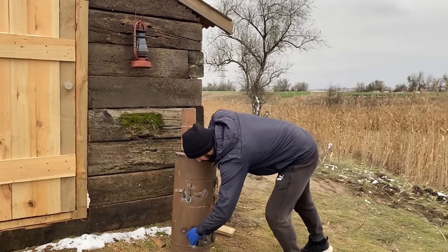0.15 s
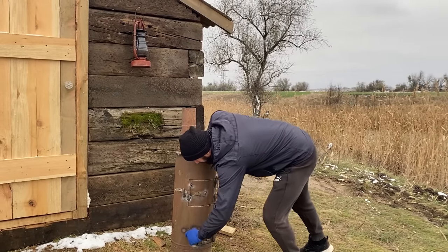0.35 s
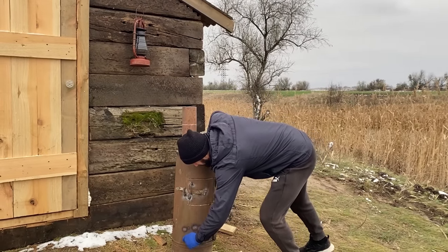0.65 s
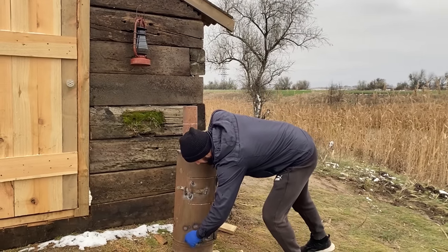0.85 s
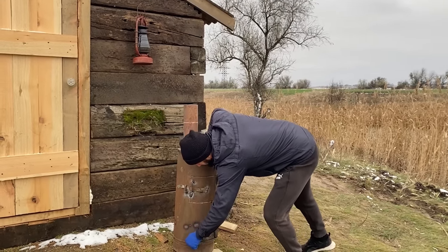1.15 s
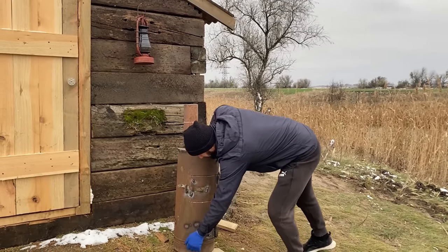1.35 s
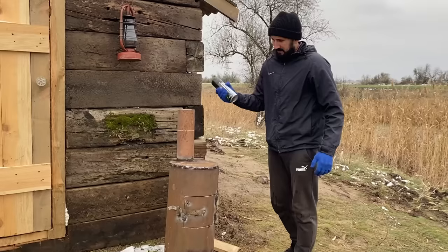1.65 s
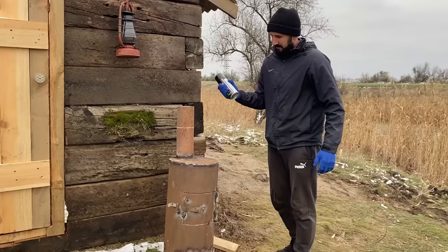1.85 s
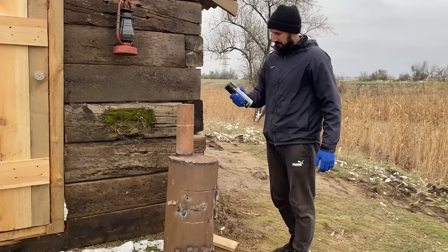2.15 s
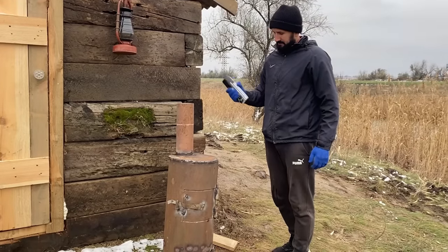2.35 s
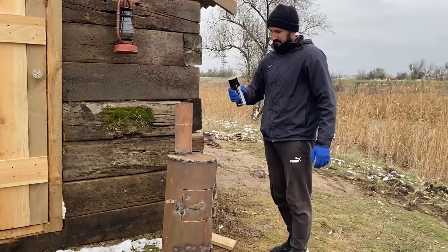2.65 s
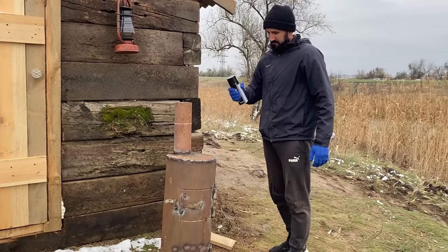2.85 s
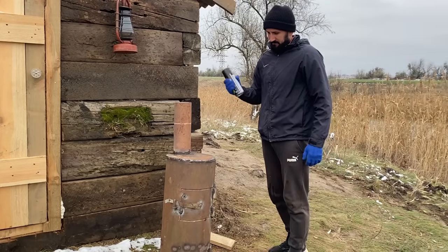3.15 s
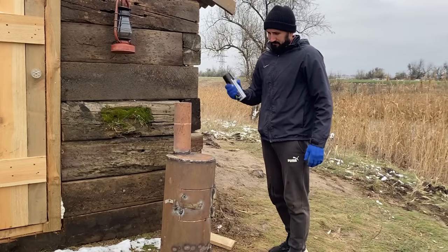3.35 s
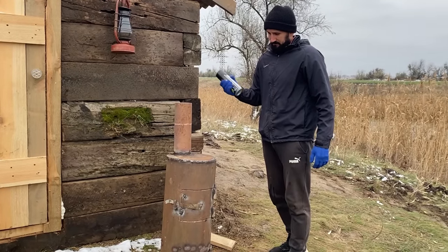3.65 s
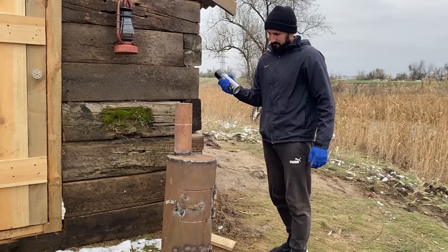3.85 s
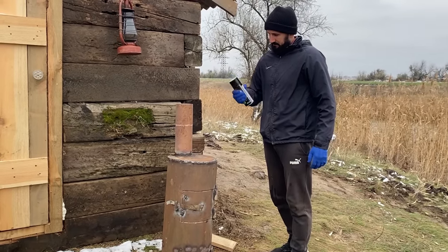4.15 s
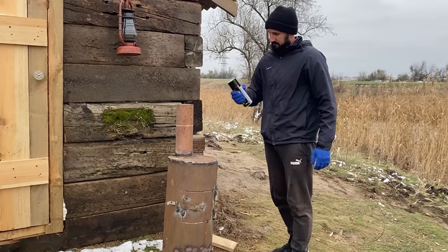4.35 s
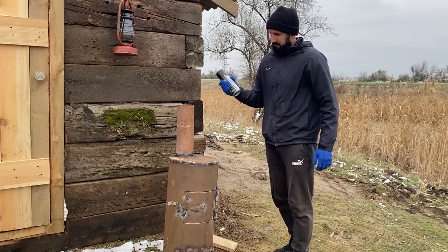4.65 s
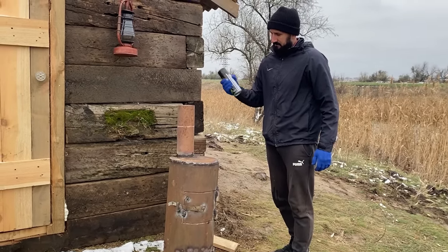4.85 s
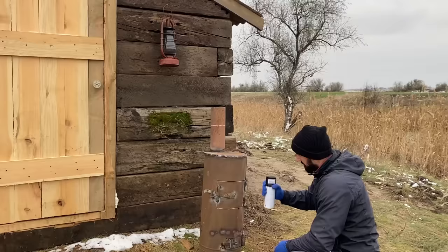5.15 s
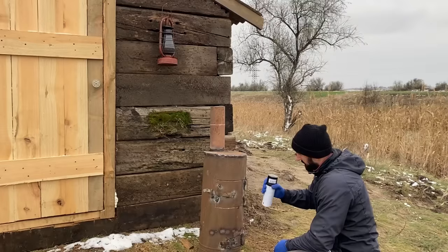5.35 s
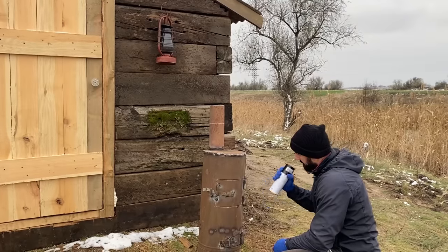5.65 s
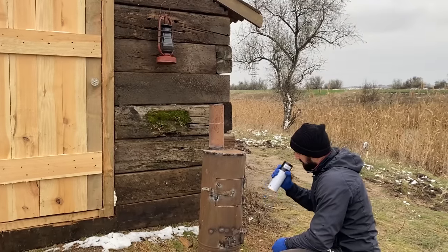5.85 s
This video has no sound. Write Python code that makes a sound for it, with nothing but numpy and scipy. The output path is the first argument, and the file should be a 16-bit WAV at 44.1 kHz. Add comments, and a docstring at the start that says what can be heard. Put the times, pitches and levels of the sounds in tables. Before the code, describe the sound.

A steel drum near the centre gives a bright crashing clang and, half a second later, a second ringing knock, with soft bumps underneath. Then an aerosol can rattles, about four or five strokes a second, hard double clacks alternating with hollower knocks over wet swishing. Breeze buffets the microphones in uneven gusts, swelling mid-way. The space is open and nearly dry, with only slight reflections from ground and shed.

```python
"""Outdoors by a wooden shed, heard on a close pair of microphone ports: a breeze rumbles over the hush of a field.
A steel stove drum just left of centre takes two main knocks and lighter touches: decaying noise plus ringing modes.
Dull bumps of sinking pitch and swells of low rumble lie under them. Then a spray-paint can is shaken: paint swishes
as surging noise, and the mixing ball clacks on the domed base, knocks in the top and ticks along the wall.
Near the end the can moves a little to the right."""
import sys
import numpy as np
from scipy import signal
from scipy.fft import rfft, irfft, next_fast_len
from scipy.io import wavfile

SR = 44100
rng = np.random.default_rng(int(sys.argv[2]) if len(sys.argv) > 2 else 0)


def master_out(mix):
    """Clip the mix to full scale and print it as 16-bit PCM to the path in sys.argv[1]."""
    frames = np.transpose(np.atleast_2d(mix))
    ceiling = np.clip(frames, -1, 1)
    pcm = np.round(ceiling * 32767).astype(np.int16)
    wavfile.write(sys.argv[1], SR, pcm)


N = 264159


def amp(db):
    """Decibels to gain."""
    return 10 ** (np.asarray(db) / 20)


def unit(x):
    """Scales to rms 1."""
    return x / np.sqrt(np.mean(x ** 2) + 1e-20)


def read(points, hz):
    """Reads a table on a log-frequency axis."""
    f, value = np.transpose(points)
    return np.interp(np.log(hz + 1), np.log(f + 1), value)


def follow(points):
    """Reads a time curve at every sample."""
    return np.interp(np.arange(N) / SR, *np.transpose(points))


def add(mix, s, sound):
    """Adds a sound into the mix at time s, cut off at the end of the mix."""
    part = mix[..., max(round(s * SR), 0):][..., :sound.shape[-1]]
    part += sound[..., :part.shape[-1]]


def fade(t, t60):
    """Exponential decay that falls 60 dB in t60 seconds."""
    return np.exp(-np.log(1000) * t / t60)


def colour(x, spectrum, bright_db=0):
    """Minimum-phase filter with the given spectrum; brightness lifts the treble against the middle."""
    size = next_fast_len(2 * len(x))
    hz = abs(np.fft.fftfreq(size, 1 / SR))
    treble = 1 / (1 + (3000 / (hz + 1)) ** 6)
    log_gain = np.log(amp(read(spectrum, hz) + bright_db * treble))
    response = np.exp(np.conj(signal.hilbert(log_gain)))  # the phase that keeps the filter causal
    return np.fft.ifft(np.fft.fft(x, size) * response).real[:len(x)]


def noise(spectrum):
    """Steady noise of rms 1 with the given spectrum."""
    hz = np.fft.rfftfreq(N, 1 / SR)
    white = rng.standard_normal(N)
    return unit(irfft(rfft(white) * amp(read(spectrum, hz)), N))


def wander(per_s):
    """A slow random curve of rms 1, with per_s new targets a second."""
    knots = np.arange(N) / SR * per_s
    return unit(np.interp(knots, np.arange(N), rng.standard_normal(N)))


def at_level(x, db, seconds):
    """Scales a hit so that its energy, spread over the given time, has this level."""
    return amp(db) * x * np.sqrt(seconds * SR / np.sum(x ** 2))


def yard(x):
    """Dull early reflections from ground and shed, then a thin scatter; drawn afresh per sound and per port."""
    t = np.arange(6000) / SR
    early, late = rng.standard_normal((2, 2, len(t)))
    band = signal.butter(2, [1500, 6000], "band", fs=SR)
    early = signal.lfilter(*band, early * fade(t, 0.026))
    late = late * fade(t, 0.22) * np.minimum(t / 0.013, 1)
    echo = amp(-14) * early / np.linalg.norm(early[0]) + amp(-32.5) * late / np.linalg.norm(late[0])
    return x + signal.fftconvolve(x[None], echo, axes=1)[:, :len(x)]


def aside(x, lag_s):
    """Moves a sound sideways: a positive lag delays the left port against the right."""
    half = np.exp(-1j * np.pi * np.fft.rfftfreq(N, 1 / SR) * lag_s)
    return irfft(rfft(x) * np.array([half, 1 / half]), N)


# strength of the breeze at the ports, before trim and gusting: t/s, level/dB
WIND = [(0, -52), (.25, -55.5), (1.1, -52.5), (1.4, -48.5), (2.4, -44), (3.8, -56), (4.7, -50.5),
        (5.12, -51.5), (5.24, -67), (5.99, -67.5)]
# low rumble of wind on the ports: f/Hz, level/dB
WIND_COLOUR = [(20, -31), (48, 1), (95, 1), (150, -9.5), (250, -19), (1500, -62)]
# hush of the open field: f/Hz, level/dB
AIR = [(40, -23), (350, -7), (700, 3), (1000, -18.5), (4000, -15.5), (12000, -17), (15000, -48)]


def wind():
    """Lumpy low noise, mostly shared by the two ports, over the steady hush of the field."""
    shared = noise(WIND_COLOUR)
    own = np.array([noise(WIND_COLOUR), noise(WIND_COLOUR)])
    gust_db = follow(WIND) + 4.4 * wander(per_s=29) - 2.5
    return (shared + amp(-6) * own) * amp(gust_db) + amp(-60.5) * noise(AIR)


# blows on the drum: t/s, level/dB (before a 0.5 dB trim), brightness/dB, rise/s, place (0 side to 1 rim)
DRUM_BLOWS = [(0.031, -34.5, -20.5, 0.02, 0), (0.381, -21, -4, 0.011, 0), (.412, -12, 7, 0.0022, 0.24),
              (.553, -40.5, -6.5, 0.015, 0.19), (0.649, -38.5, -11.5, 0.025, 0.79),
              (.686, -37, -10, 0.018, 0.54), (1.053, -14, 1, 0.015, 0.86),
              (1.403, -35.5, -19.5, 0.02, 0.56)]
# separate modes of the drum: f/Hz, level struck on the side/dB, level struck on the rim/dB, t60/s
DRUM_MODES = [(269, -20, -13.5, 0.53), (438, -20, -1.5, 0.39), (588, -23, -22, 1), (627, -21.5, -22.5, 2),
              (647, -16, -17, 1), (699.7, 1.5, -11, 0.43), (815, -13.5, -10, 0.26), (946, -17.5, -28, 2),
              (1008, -9.5, -9, 0.28), (1190, 2.5, 4, 0.19), (1219, 2.5, -15, 0.25), (1240, 10, 10, 0.14),
              (1540, -28, -6.5, 0.6), (1604, -35, 6, .33), (1810, -12.5, 6, 0.24), (1916, -12.5, -11, 0.64),
              (2090, -13, -0.5, 0.15), (2570, -8.5, -21.5, 0.14), (2940, 6.5, -20, 0.04),
              (3880, -24.5, -9.5, 0.32), (4310, -4.5, -22.5, 0.1)]
# dense upper modes of the sheet steel: f/Hz, level/dB
CLASH = [(100, -13.5), (500, -5.5), (1200, -3), (2200, 1.5), (4300, -1), (6800, -11), (8000, -10.5),
         (12400, -19.5), (14500, -49.5)]
# how long the wash of crowded modes lasts: f/Hz, t60/s
CLASH_T60 = [(600, 0.6), (2000, 0.42), (4000, 0.25), (10000, 0.18)]


def drum():
    """Each blow is a clash of sheet steel: a short crash, a wash of crowded modes and a few that ring on alone."""
    out, t = np.zeros((2, N)), np.arange(3 * SR // 2) / SR
    hz, side_db, rim_db, t60 = np.transpose(DRUM_MODES)[:, :, None]
    modes = fade(t, t60) * np.sin(2 * np.pi * (hz * t + rng.random(hz.shape)))
    for s, db, bright_db, rise, place in DRUM_BLOWS:
        mode_db = side_db + (rim_db - side_db) * np.clip(place, 0, 1)
        ring = amp(mode_db)[:, 0] @ modes
        f, when, z = signal.stft(rng.standard_normal(len(t)), SR, nperseg=256)
        decay = fade(when, read(CLASH_T60, f)[:, None])
        wash = signal.istft(z * decay, SR, nperseg=256)[1][:len(t)]
        crash = rng.standard_normal(len(t)) * fade(t, 0.11)
        clash = colour(crash + amp(-12.5) * wash, CLASH, bright_db)
        contact = np.minimum(t / rise, 1) * (1 + 0.2 * fade(t, .06))  # the push on the steel favours the start
        sound = (unit(clash) + amp(-2.0) * unit(ring)) * contact
        add(out, s, yard(at_level(sound, db - .5, 0.026)))
    return out


# low thumps: t/s, level/dB, f/Hz (nominal; the pitch sinks from 2.2 towards 0.66 times this), t60/s
THUMPS = [(0.048, -25.5, 147, 0.22), (0.081, -9.5, 108, 0.023), (0.126, -12, 220, 0.039),
          (0.852, -32, 59.9, .07), (0.921, -28, 80.2, .07), (1.355, -25.5, 85, .07),
          (1.615, -21, 65, 0.046), (4.47, -36.5, 130, .06), (4.825, -37, 110, .05)]


def thumps():
    """Dull, quickly damped sine bumps whose pitch sinks."""
    out, t = np.zeros(N), np.arange(SR // 4) / SR
    for s, db, hz, t60 in THUMPS:
        turns = np.cumsum(hz * (0.66 + 1.54 * fade(t, 0.029))) / SR
        attack = np.minimum(t / 0.0023, 1)
        add(out, s, amp(db) * np.sin(2 * np.pi * turns) * fade(t, t60) * attack)
    return out


BOOM_DB, BOOM_T60 = -22.5, 0.75  # rumble against the level of a blow on the drum's side; decay in s
SHUDDER_DB, SHUDDER_T60 = -12.5, .16  # the same after a thump


def rumble():
    """Low noise swells and dies after each thump and each blow on the drum; the stiff rim hardly booms."""
    swell, t = np.zeros(N), np.arange(SR) / SR
    for s, db, _, _, place in DRUM_BLOWS:
        boom = max(1 - place, 0) * fade(t, BOOM_T60) * np.minimum(t / .02, 1)
        add(swell, s, amp(db + BOOM_DB) * boom)
    for s, db, _, _ in THUMPS:
        shudder = fade(t, SHUDDER_T60) * np.minimum(t / .008, 1)
        add(swell, s, amp(db + SHUDDER_DB) * shudder)
    return swell * noise(WIND_COLOUR)


# vigour of the swirl inside the can, before surges and sloshing: t/s, level/dB
SHAKING = [(1.58, -68), (1.66, -53.5), (2.5, -50.5), (3.6, -51), (4.7, -48), (5.14, -53.5), (5.25, -47.5),
           (5.55, -46), (5.87, -57)]
# how the wall of the can radiates: f/Hz, level/dB
WALL_COLOUR = [(100, -30), (450, -19), (900, -9), (1700, -3), (2700, -13), (4400, -15.5), (6000, -18),
               (12200, -21.5), (15500, -37.5)]
# down strokes, the ball strikes the domed base, then a second clack follows, on the base or, when weak,
# on the wall: t/s, level/dB, brightness/dB, second clack after t/s, its level against the first/dB
STROKES = [(1.7186, -18.5, 0, 0.033, -7), (1.9286, -19.5, -4, 0.013, 3), (2.157, -24, 0.5, 0.0071, 1),
           (2.6357, -22.5, 3.5, 0.045, -16), (2.8441, -19.5, -1.5, 0.029, -6), (3.059, -18, 1, 0.029, -4.5),
           (3.2735, -19, 0, .0252, -3.5), (3.4821, -19.5, -1, 0.029, -5.5), (3.703, -21.5, 3.5, 0.013, -1),
           (3.894, -18, -5.5, 0.031, -19.5), (4.144, -24.5, -4.5, 0.029, -19),
           (4.3404, -21, 2.5, .0698, -21.5), (4.5679, -26, -4, 0.025, -3.5), (5.3153, -23, 3.5, 0.028, -22),
           (5.5197, -22.5, 5, 0.02, -18), (5.701, -21.5, -2, 0.03, 1.5), (5.921, -20.5, 1.5, 0.0043, -3.5)]
SURGE_S, SURGE_DB = 0.098, 4  # from each down stroke the paint surges and the ball rolls off the base
SWIRL_DB, SWIRL_PER_S = 2, 22  # the paint sloshes unevenly: depth, and changes per second


def paint():
    """Paint swishes in surges, and the ball skitters through it, most busily as it rolls off the base."""
    t, rolling = np.arange(N) / SR, np.zeros(N)
    for s, *_ in STROKES:
        add(rolling, s, np.hanning(round(SURGE_S * SR)))
    effort_db = follow(SHAKING) + SURGE_DB * rolling + SWIRL_DB * wander(per_s=SWIRL_PER_S)
    out = noise(WALL_COLOUR) * amp(effort_db + 2.9 * wander(per_s=130) - 9.0)
    chance, size, bright = rng.random(N), rng.standard_normal(N), rng.standard_normal(N)
    ticks = rng.standard_normal((64, 1024)) * fade(t[:1024], .012)
    touches = (chance < (65 + 90 * rolling) / SR) & (effort_db > -60)  # on average 65 to 155 a second
    for at in np.flatnonzero(touches):
        db = effort_db[at] + 4.0 * np.clip(size[at], -2, 1.5)
        tick = colour(ticks[at % len(ticks)], WALL_COLOUR, 4 * bright[at] - 3.5)  # paint muffles most touches
        add(out, t[at], at_level(tick, db, 0.01))
    return out


# modes of the can, before each clack's random detuning and reweighting: f/Hz, level/dB, t60/s
CAN_MODES = [(925, -17, 0.046), (1905, -20, 0.011), (2993, -28, 0.061), (3820, -29, 0.056),
             (4333, -20, 0.021), (4603, -37, 0.11), (5267, -14, 0.017), (7260, -26, 0.048)]


def clack(spectrum, db, bright_db, gap, second_db, second_hz, shell_t60, ring_db):
    """The ball strikes and lands again, duller; each contact shakes the paint-damped shell and its modes."""
    t = np.arange(6000) / SR
    hz, mode_db, t60 = np.transpose(CAN_MODES)[:, :, None]
    # each clack rings at slightly different pitches and strengths, drawn at random
    detune, weight = rng.standard_normal((2, len(hz), 1))
    contacts = []
    for _ in range(2):
        shell = rng.standard_normal(len(t)) * (fade(t, shell_t60) + amp(-23.5) * fade(t, 0.081))
        shell[0] += 6.5  # the bare tick of steel on steel
        turns = hz * (1 + 0.021 * detune) * t + rng.random(hz.shape)
        modes = amp(mode_db + 4.2 * weight) * fade(t, t60) * np.sin(2 * np.pi * turns)
        contacts.append(shell + amp(ring_db) * modes.sum(0))
    sound, second = contacts
    soft = signal.butter(1, min(second_hz, SR / 3), fs=SR)
    add(sound, gap * rng.uniform(0.7294, 1.1), amp(second_db) * signal.lfilter(*soft, second))
    return yard(at_level(colour(sound, spectrum, bright_db), db, 0.01))


# how the domed base radiates: f/Hz, level/dB
BASE_COLOUR = [(100, -29), (480, -23.5), (780, -12), (1150, -14), (1850, -6), (2600, -9.5), (4400, -3.5),
               (6000, -8), (8000, -12.5), (12400, -13), (15500, -37.5)]
# up strokes, the ball knocks in the top of the can: t/s, level/dB
TOP_HITS = [(1.823, -25.5), (1.8583, -31.5), (2.0545, -27), (2.2874, -28.5), (2.468, -33.5),
            (2.7349, -26.5), (2.972, -26.5), (3.1745, -23.5), (3.378, -25), (3.591, -27.5), (3.5983, -26.5),
            (3.8061, -23.5), (4.224, -26.5), (4.4464, -25.5), (4.9081, -33), (5.0724, -32), (5.1007, -31.5),
            (5.189, -30.5), (5.2024, -30.5), (5.4, -27.5), (5.6218, -34), (5.7902, -27), (5.803, -28.5)]
# how the top radiates: f/Hz, level/dB
TOP_COLOUR = [(100, -34.5), (450, -24), (850, -6.5), (1130, -9), (1750, -7.5), (3100, -11.5), (4500, -21.5),
              (6000, -25), (7100, -13.5), (8300, -19), (12200, -17), (15500, -35)]
# the loudest glances off the wall: t/s, level/dB
WALL_HITS = [(1.763, -35.5), (1.9621, -29.5), (1.9932, -31.5), (2.0945, -35.5), (2.211, -35),
             (2.3175, -38.5), (2.422, -37.5), (2.46, -38.5), (2.5234, -34.5), (2.6785, -36.5),
             (2.886, -33.5), (2.8966, -33), (2.925, -38), (3.068, -31), (3.3419, -37), (3.53, -36),
             (3.7696, -36), (3.86, -38), (3.957, -36.5), (3.9749, -37.5), (4.0337, -26), (4.0497, -30.5),
             (4.3816, -37.5), (4.607, -35), (4.6709, -29), (4.8791, -34.5), (5.2185, -35), (5.3326, -36),
             (5.6328, -37.5), (5.9156, -28.5)]
TOP_BRIGHT_DB, WALL_BRIGHT_DB = 0, -2.5  # treble of knocks and of glances against their middle
# brightness of a second clack as strong as the first, and its change per dB of relative level:
# the weaker second clacks, many of them glances off the wall, are duller
SECOND_BRIGHT_DB, BRIGHT_PER_DB = 4.5, 0.8


def ball():
    """Hard clacks on the base, each with a second clack after it, hollow knocks in the top, light wall ticks."""
    out = np.zeros((2, N))
    for s, db, bright_db, after, second_db in STROKES:
        first = s, db, bright_db
        second = s + after, db + second_db, SECOND_BRIGHT_DB + BRIGHT_PER_DB * second_db
        for at, hit_db, hit_bright_db in (first, second):  # both are coloured by the base
            add(out, at, clack(BASE_COLOUR, hit_db, hit_bright_db, gap=0.0024, second_db=-3.0,
                               second_hz=11900, shell_t60=.013, ring_db=0.0))
    for s, db in TOP_HITS:
        add(out, s, clack(TOP_COLOUR, db, TOP_BRIGHT_DB, gap=0.0028, second_db=3.5,
                          second_hz=1444, shell_t60=0.029, ring_db=1.5))
    for s, db in WALL_HITS:
        add(out, s, clack(WALL_COLOUR, db, WALL_BRIGHT_DB, gap=0.005, second_db=-7.5,
                          second_hz=5000, shell_t60=0.012, ring_db=-2.5))
    return out


DRUM_LAG_S = -0.0000048  # the drum stands a little to the left
MOVE_S, MOVE_LAG_S = 5.7, .000025  # from this time on the can is held to the right


def scene():
    """Wind, drum and can together, the drum and can placed across the pair of ports."""
    air = wind()
    steel = aside(drum(), DRUM_LAG_S) + thumps() + rumble()
    can = paint() + ball()
    can = np.where(np.arange(N) / SR < MOVE_S, can, aside(can, MOVE_LAG_S))
    return air + steel + can


# phase between the ports: f/Hz, left leads by/radians
PORT_PHASE = [(0, 0.62), (1500, 0.13), (2600, 1.5), (3800, 0.71), (5100, 0.95), (5900, 1.6), (7000, -0.5),
              (15000, -11.5)]
# level between the ports: f/Hz, left minus right/dB
PORT_BALANCE = [(400, 0.5), (950, -2.5), (1900, -4.5), (2500, -2), (2900, 5), (3700, 0), (8000, 0)]
EDGE_HZ = 16600  # upper band limit


def record(dry):
    """The two ports differ in phase and level; peaks clip at 0.9; then a low-pass limits the band."""
    hz = np.fft.rfftfreq(N, 1 / SR)
    phase = np.interp(hz, *np.transpose(PORT_PHASE))
    half = amp(read(PORT_BALANCE, hz) / 2) * np.exp(1j * phase / 2)  # each port takes half the difference
    ports = np.clip(irfft(rfft(dry) * np.array([half, 1 / half]), N), -.9, .9)
    low_pass = signal.firwin(511, EDGE_HZ, window=("kaiser", 9), fs=SR)
    return signal.oaconvolve(ports, low_pass[None], "same")


dry = scene()
out = record(dry)
master_out(out)
```